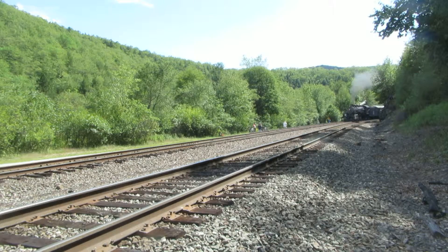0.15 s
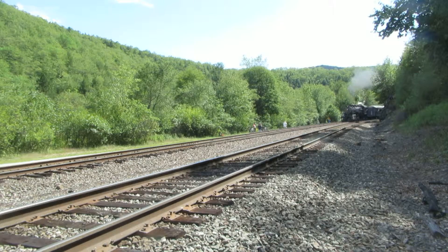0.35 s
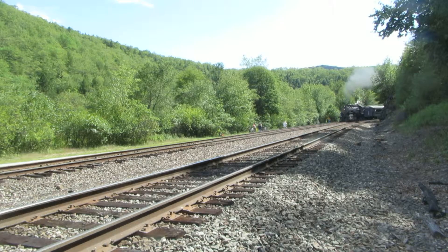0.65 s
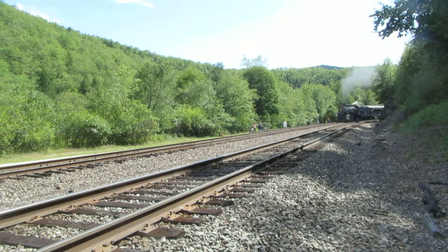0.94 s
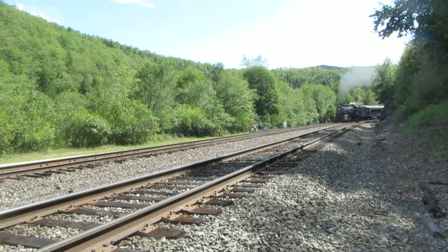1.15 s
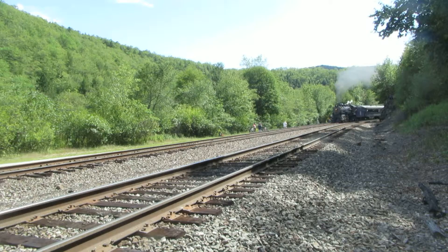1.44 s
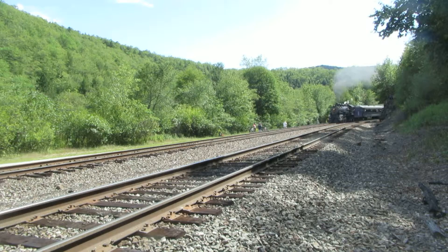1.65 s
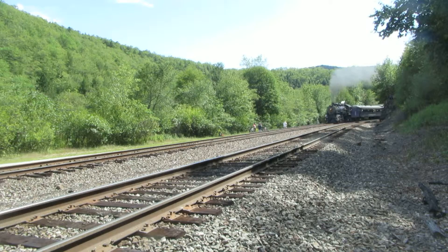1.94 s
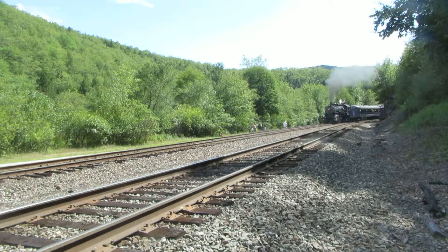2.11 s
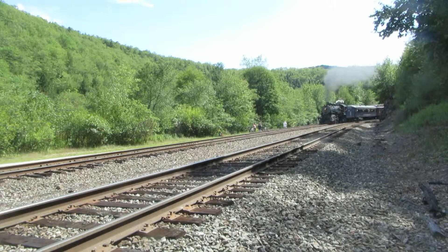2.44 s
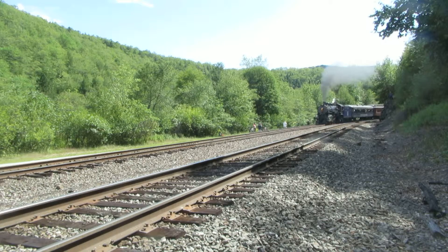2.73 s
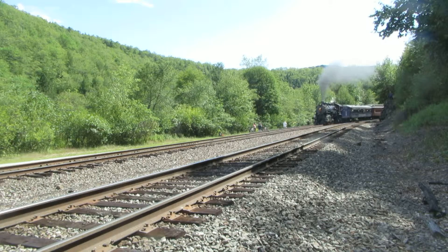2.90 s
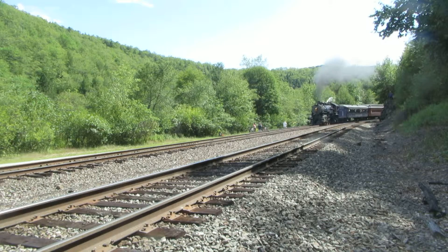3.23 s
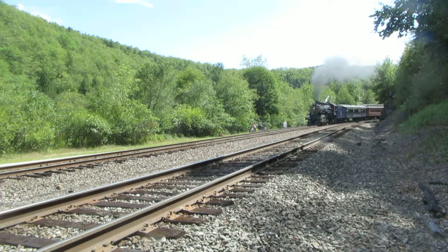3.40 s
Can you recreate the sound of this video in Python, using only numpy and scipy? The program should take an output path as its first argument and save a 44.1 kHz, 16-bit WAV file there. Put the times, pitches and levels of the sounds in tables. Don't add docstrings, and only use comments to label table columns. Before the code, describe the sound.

Rapid, steady steam engine exhaust chuffs echo off trees while a close camera clicks three times

```python
import sys
import numpy as np
from scipy import signal
from scipy.fft import rfft, irfft
from scipy.io import wavfile
from scipy.ndimage import uniform_filter1d, minimum_filter1d

SR = 44100
rng = np.random.default_rng(int(sys.argv[2]) if len(sys.argv) > 2 else 0)


def dump(signal):
    limited = np.clip(np.atleast_2d(signal).T, -1, 1)
    pcm = np.round(limited * 32767).astype(np.int16)
    wavfile.write(sys.argv[1], SR, pcm)


def volts_from_db(level):
    exponent = np.asarray(level, float) / 20
    return 10 ** exponent


N = 156996

# (valve opens [s], jet level [dB], hiss over jet as the air clears or blurs [dB],
# chimney boom over jet [dB])
BEATS = [(-0.032, -20, -11.5, 2), (0.091, -19, -15.5, -2.5), (0.236, -17, -14.5, -3),
         (0.363, -17, -14.5, -4), (0.515, -19.5, -19, -1.5), (0.629, -19, -17.5, -2),
         (0.773, -19.5, -17, 0), (0.906, -17.5, -17, -2.7), (1.043, -18, -16, -5.5), (1.169, -17, -14, -3),
         (1.307, -17, -13.5, -1.5), (1.435, -18, -14.5, -1.1), (1.582, -18.5, -14, -2.2),
         (1.707, -19.5, -12, -3.5), (1.837, -18, -14, -3), (1.973, -19, -14.5, -0.2),
         (2.114, -20.5, -12.5, 1.5), (2.239, -20, -14, 1.5), (2.371, -19.5, -14.5, 1.8),
         (2.501, -18.5, -15, 2.6), (2.645, -18.5, -14, 2.1), (2.768, -18.5, -12, 1.5),
         (2.902, -19.5, -9.5, 1.5), (3.03, -16.5, -9.5, 1), (3.168, -19, -8.5, -0.7),
         (3.29, -20, -9.5, 3.5), (3.43, -20.5, -11, 2)]


def evened(x):
    return x / np.sqrt(np.mean(x ** 2) + 1e-20)


def read(points, hz):
    f, value = np.transpose(points)
    return np.interp(np.log(hz + 1), np.log(f + 1), value)


def coloured(x, gain):
    hz = np.fft.rfftfreq(x.shape[-1], 1 / SR)
    return irfft(rfft(x) * gain(hz), x.shape[-1])


def smoothed(x, size, axis=-1):
    return uniform_filter1d(uniform_filter1d(x, size, axis), size, axis)


def valley(x):
    # (frequency [Hz], time to fall 60 dB [s])
    decay = [(100, 1.58), (1000, 1.28), (5000, 0.91), (12000, 0.75)]
    hz, t, z = signal.stft(rng.standard_normal(SR), SR, nperseg=256)
    fade = volts_from_db(-60 * t / read(decay, hz)[:, None])
    tail = signal.istft(z * fade * (t > .02), SR, nperseg=256)[1]
    lead_in = x[SR:0:-1]
    return signal.fftconvolve(np.r_[lead_in, x], tail / np.linalg.norm(tail))[SR:SR + N]


def camera():
    # (shutter opens [s], level [dB])
    shots = [
        (.609, -32),
        (1.6162, -33.5),
        (2.6748, -33),
    ]
    # (time after opening [s], level [dB], rattle length [s])
    steps = [
        (-.0185, -9, .004),
        (0, 0, .002),
        (.0601, -1, .0025),
        (.074, -11, .003),
        (.1075, 4, .0026),
        (.118, -2, .0035),
    ]
    # (frequency [Hz], level [dB], time to fall 60 dB [s])
    parts = [(6500, -6, .002), (8600, 1, .0025), (10200, -1, .002), (11900, -1, .0025), (13300, -1, .003),
             (14800, -5, .002)]
    whirr_db, left_db, left_lead_s = -27, 3.0, 2e-5

    t, shake = np.arange(N) / SR, np.zeros(N)
    for opens, shot_db in shots:
        shake += volts_from_db(shot_db + whirr_db) * (t > opens - .03) * (t < opens + .14)
        for lag, step_db, rattle_s in steps:
            u = np.clip((t - opens - lag) / rattle_s, 0, 30)
            shake += volts_from_db(shot_db + step_db) * (u > 0) * np.exp(-u ** 2)
    age = np.arange(1200) / SR
    body = np.zeros(1200)
    for k, (hz, db, t60) in enumerate(parts):
        body += (-1) ** k * volts_from_db(db - 60 * age / t60) * np.sin(2 * np.pi * hz * age)
    body /= np.linalg.norm(body)
    chatter = shake * rng.choice([-1., 1.], (2, N))
    near, stray = signal.oaconvolve(chatter, body[None], axes=1)[:, :N]
    right = coloured(near, lambda hz: np.exp(-2j * np.pi * hz * left_lead_s))
    return np.array([volts_from_db(left_db) * near, .8 * right + .4 * stray])


def air(x):
    # (time [s], strength [0-1])
    ground = [(0, 0.63), (.35, 0.53), (.7, 0.61), (1.298, 0.43), (1.7, 0.65), (2.2, 0.64), (2.8, 0.64),
              (3.56, 0.6)]
    notches = [3720, 3980]
    # (frequency [Hz], likeness [0-1])
    likeness = [(60, 0.99), (300, 0.99), (1000, 0.93), (3800, 0.89), (8000, 0.91), (15000, 0.34)]
    # (frequency [Hz], left minus right [dB])
    balance = [(60, 0.5), (180, 0.0), (550, 0.0), (1650, 0.0), (4970, -2), (15000, 0)]
    # (frequency [Hz], left leads by [rad])
    lead = [(100, 0), (1000, -.1), (2000, -.35), (4400, -.7), (6200, -.7), (8300, -1.4), (10600, -1.1),
            (14000, -1.2)]
    scatter_hz, patch_db = 10200, .8

    hz, t, z = signal.stft(x, SR, nperseg=512, noverlap=384)
    s, strength = np.transpose(ground)
    echo = np.clip(np.interp(t, s, strength), 0, 1) * np.exp(-(hz[:, None] / scatter_hz) ** 4)
    for notch in notches:
        delayed = echo * np.exp(-1j * np.pi * hz[:, None] / notch)
        z = z * (1 + delayed) / (1 + echo)

    patches = rng.standard_normal(z.shape[::-1]).T
    patches = evened(uniform_filter1d(uniform_filter1d(patches, 6, 0), 24, 1))
    z = z * volts_from_db(patch_db * patches)

    same = np.clip(read(likeness, hz), 0, 1)[:, None]
    stray = abs(z) * np.exp(2j * np.pi * rng.random(z.shape[::-1]).T) * 1.62
    middle = np.sqrt((1 + same) / 2) * z
    side = np.sqrt((1 - same) / 2) * stray
    lean = (volts_from_db(read(balance, hz) * .5) * np.exp(.5j * read(lead, hz)))[:, None]
    pair = np.array([(middle + side) * lean, (middle - side) / lean])
    return signal.istft(pair, SR, nperseg=512, noverlap=384)[1][:, :N]


def blast(level_db, fall_db_per_s):
    rise_s, hold_s, leak_db = 0.032, .015, -20
    t, opens = np.arange(N) / SR, np.array(BEATS)[:, 0]
    age = t - opens[:, None]
    swell = np.sin(np.pi / 2 * np.clip(age / rise_s, 0, 1)) ** 2
    sag_db = fall_db_per_s * np.maximum(age - rise_s - hold_s, 0)
    power = swell * volts_from_db(2 * (level_db[:, None] + sag_db))
    leak = volts_from_db(2 * (leak_db + np.interp(t, opens, level_db)))
    return np.sqrt(power.sum(0) + leak)


def chimney(hz):
    # (frequency [Hz], level per Hz [dB])
    jet_colour = [(25, -20), (60, -10), (200, -14), (400, -9), (1500, -5.5), (5500, -3.5), (10000, -21.5),
                  (15500, -52.5)]
    # (frequency [Hz], width [Hz], level above the jet [dB])
    pipe = [(123, 55, 17), (145.6, 24.6, 19), (293, 156, 8.5), (431.3, 153, 9), (704, 270, 6.5),
            (1002, 150, 6.5), (1270, 170, 1), (1603, 290, 0.5), (2190, 230, 3.5), (3075, 2100, 4.5)]
    rings = sum(volts_from_db(2 * db) / (1 + ((hz - f) / (w / 2)) ** 2) ** 2 for f, w, db in pipe)
    return volts_from_db(read(jet_colour, hz)) * np.sqrt(1 + rings)


def exhaust():
    eddy_s, eddy_db = .003, .6
    cracks_per_s, crack_db, crack_share = 900, 2.0, 2.2
    boom_top_hz, hiss_foot_hz, fizz_foot_hz = 810, 3850, 9720
    boom_fall, jet_fall, hiss_fall = -88, -105, -95
    hiss_ref_db, fizz_db, fizz_swing = -5.5, -1.9, 1.46
    gain_db = 9

    eddies = evened(smoothed(rng.standard_normal(N), round(eddy_s * SR)))
    crack_size = volts_from_db(crack_db * np.minimum(rng.exponential(1, N), 4))
    cracks = (rng.random(N) < cracks_per_s / SR) * crack_size * rng.choice([-1., 1.], N)
    steam = evened(rng.standard_normal(N) + crack_share * cracks)
    jet = coloured(steam * volts_from_db(eddy_db * eddies), chimney)

    boom = coloured(jet, lambda hz: 1 / (1 + (hz / boom_top_hz) ** 4))
    high = coloured(jet, lambda hz: 1 - 1 / (1 + (hz / hiss_foot_hz) ** 6))
    fizz = coloured(high, lambda hz: 1 - 1 / (1 + (hz / fizz_foot_hz) ** 6))

    _, jet_db, hiss_db, boom_db = np.transpose(BEATS)
    fizz_level_db = jet_db + fizz_db + fizz_swing * (hiss_db - np.mean(hiss_db))
    out = boom * blast(jet_db + boom_db, boom_fall)
    out += (jet - boom - high) * blast(jet_db, jet_fall)
    out += (high - fizz) * blast(jet_db + hiss_db - hiss_ref_db, hiss_fall)
    out += fizz * blast(fizz_level_db, hiss_fall)
    return volts_from_db(gain_db) * out / np.std(jet)


def scene():
    valley_db = -8.5
    engine = exhaust()
    return air(engine + volts_from_db(valley_db) * valley(engine)) + camera()


def roll_off(x):
    return signal.sosfilt(signal.butter(12, 15690, fs=SR, output="sos"), x)


def record(dry):
    # (frequency [Hz], level [dB])
    mic = [(20, -8.5), (100, -0.5), (5000, 2), (8200, -3.5), (10200, -1), (11500, -5), (13500, -6),
           (15700, -16)]
    dip_hz, dip_width_hz, dip_depth, ceiling = 3750, 140, 0.53, .66

    def response(hz):
        dip = dip_depth / (1 + ((hz - dip_hz) / dip_width_hz) ** 2)
        return volts_from_db(read(mic, hz)) * (1 - dip)

    heard = coloured(dry, response)
    room = np.minimum(ceiling / (abs(heard).max(0) + 1e-9), 1)
    limiter = smoothed(minimum_filter1d(room, size=301), 151)
    return roll_off(heard * limiter)


dry = scene()
out = record(dry)
dump(out)
```